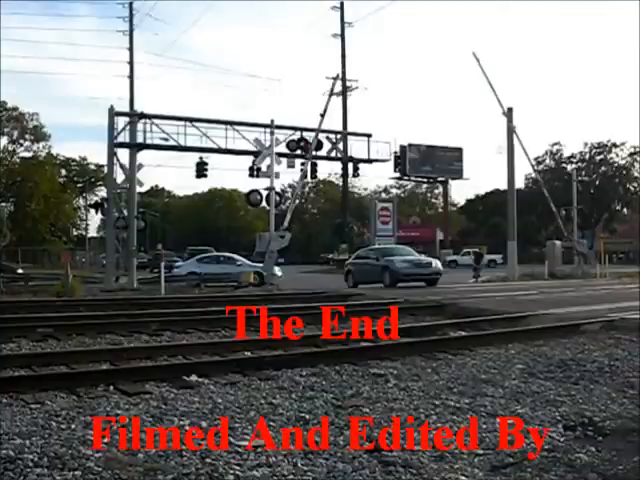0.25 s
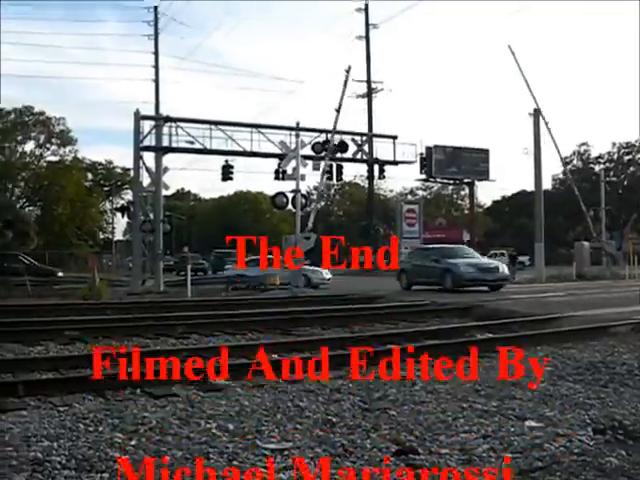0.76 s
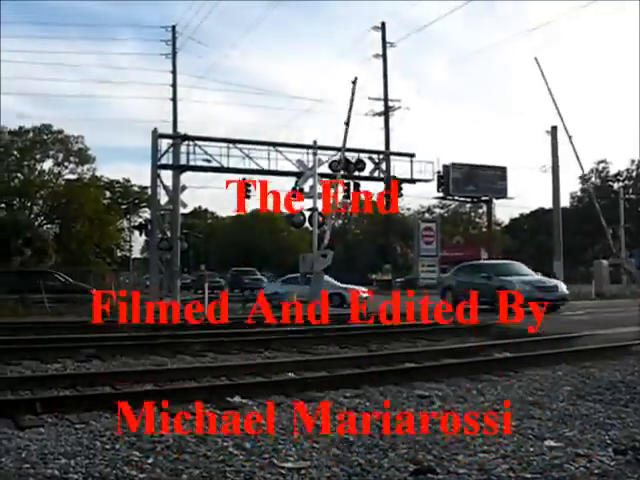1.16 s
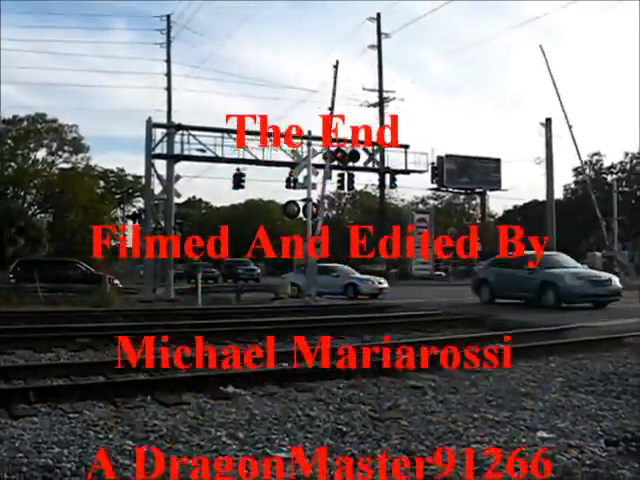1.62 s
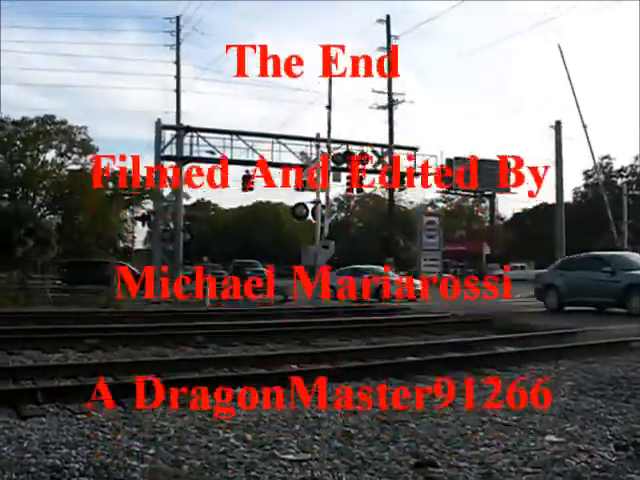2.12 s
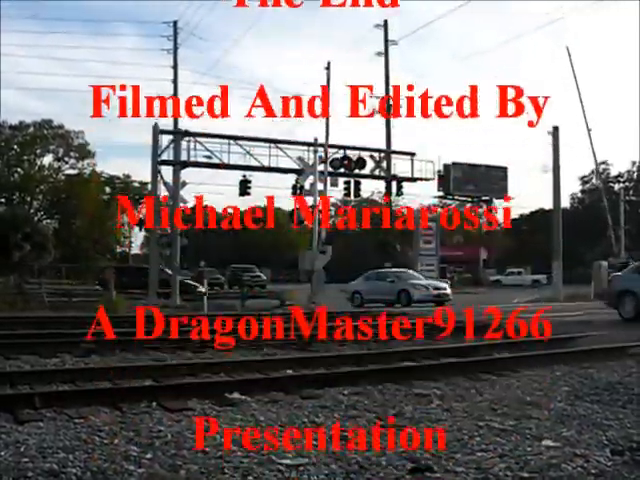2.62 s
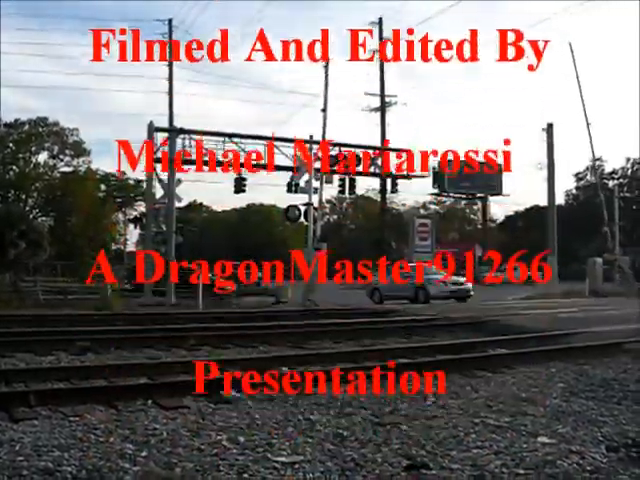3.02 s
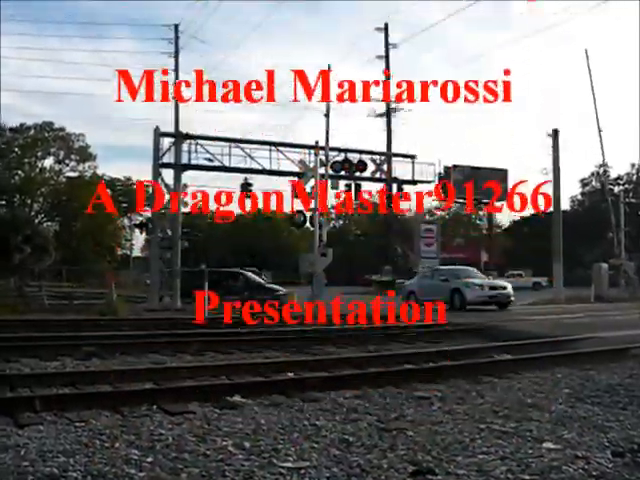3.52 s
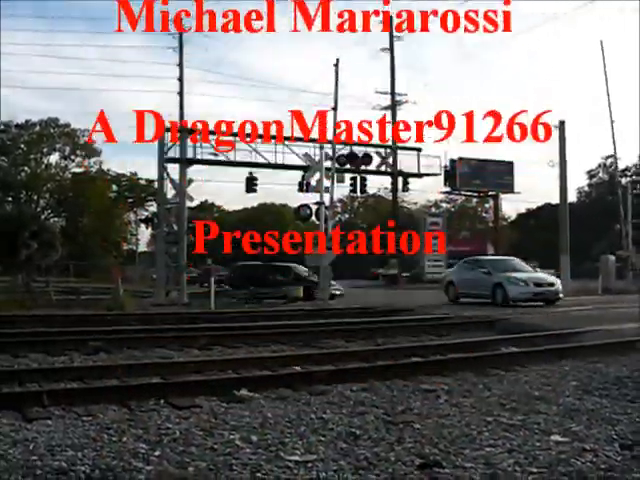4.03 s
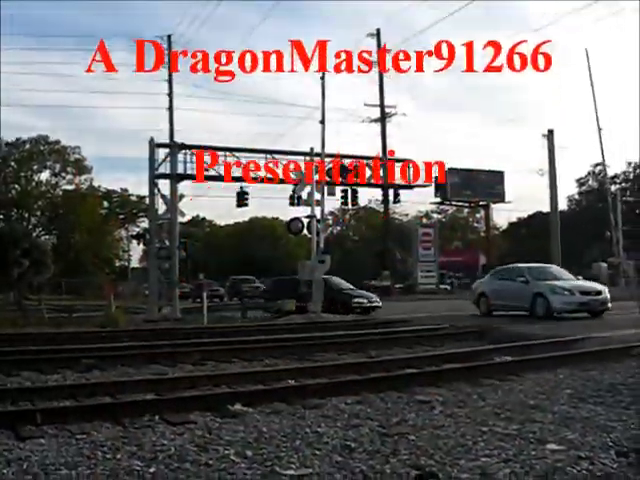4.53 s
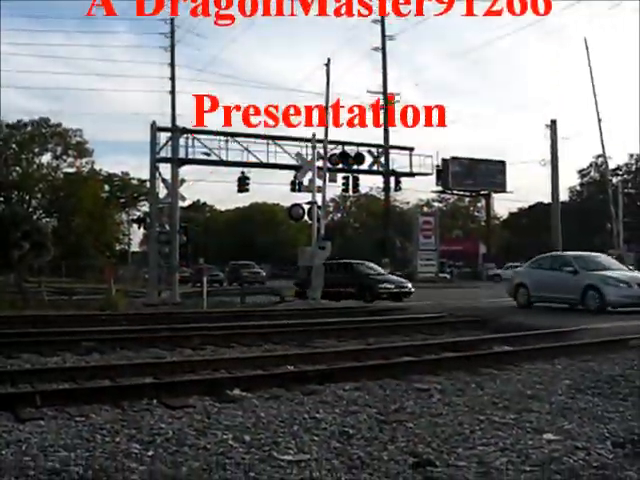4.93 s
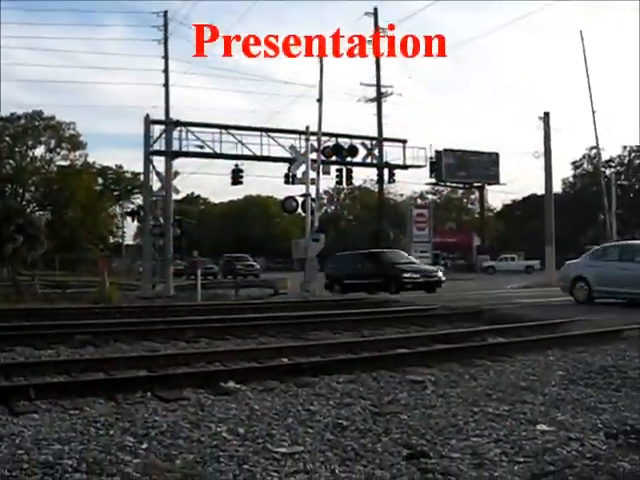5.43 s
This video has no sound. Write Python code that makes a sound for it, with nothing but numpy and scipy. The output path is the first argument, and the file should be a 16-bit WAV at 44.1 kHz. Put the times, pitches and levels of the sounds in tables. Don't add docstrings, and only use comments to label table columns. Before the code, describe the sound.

A small camera held outdoors in gusty wind, in mono, with its microphone overloaded at times. Lumpy low buffeting and brighter flutter run throughout, strongest around 1.9-2.1 s, with single pops of air. Well beneath, distant cars hiss over a road; an engine hums low, rising in pitch until about 3.3 s, with a very faint high belt whine. A knock and rub on the casing come at once, a faint brake squeal at 0.15-0.4 s, and a thin, high bird whistle at 0.7-1.1 s. Hard, hollow blows with plastic rattles hit near 0.9, 2.1 and 3.4 s, the level ducking briefly after the loudest. From 3.4 s it is somewhat calmer; the first engine slows while a second rises from 4.5 s. Soft low thumps at 4.6-4.9 s, dry button ticks at 4.7, 5.0 and 5.15 s, the nearest car's tyres around 5.35 s, and a scratchy rub at 5.6 s close it.

```python
import sys
import numpy as np
from scipy import signal
from scipy.fft import rfft, irfft, next_fast_len
from scipy.io import wavfile
from scipy.ndimage import uniform_filter1d, map_coordinates

SR = 44100
rng = np.random.default_rng(int(sys.argv[2]) if len(sys.argv) > 2 else 0)


def store_wav(level_fs):
    pcm = np.round(np.clip(np.atleast_2d(level_fs), -1, 1) * 32767)
    wavfile.write(sys.argv[1], SR, pcm.T.astype(np.int16))


def linear_from_db(decibels):
    return 10 ** (np.asarray(decibels, float) / 20)


N = 249606


def unit(x):
    return x / np.sqrt(np.mean(x ** 2) + 1e-20)


def along(points, hz):
    f, v = np.transpose(points)
    return np.interp(np.log(hz + 1), np.log(f + 1), v)


def curves(rows):
    s, *cols = np.transpose(rows)
    return [np.interp(np.arange(N) / SR, s, c) for c in cols]


def wobble(rate):
    knots = rng.standard_normal(int(N * rate / SR) + 4)
    return map_coordinates(knots, [np.arange(N) * rate / SR])


def swell(s, before, after):
    t = np.arange(N) / SR - s
    return np.where(t < 0, t / before, t / after)


def filtered(x, response):
    m = next_fast_len(len(x) + 8192)
    return irfft(rfft(x, m) * response(np.fft.rfftfreq(m, 1 / SR)), m)[:len(x)]


def body(modes):
    def response(f):
        total = 0
        for k, (hz, width, db) in enumerate(modes):
            total = total + (-1) ** k * linear_from_db(db) * 1j * f * width / (hz * hz - f * f + 1j * f * width)
        return total
    return response


def rush(colour_db, patchy_db):
    z = signal.stft(rng.standard_normal(N), nperseg=512)[2]
    field = uniform_filter1d(rng.standard_normal(z.shape), 5, 0)
    field = uniform_filter1d(field, 10, 1)
    x = signal.istft(z * linear_from_db(patchy_db * unit(field)), nperseg=512)[1][:N]
    return unit(filtered(x, lambda hz: linear_from_db(colour_db(hz))))


def burst(events, modes):
    x, t = np.zeros(N + SR), np.arange(SR // 4) / SR
    for s, db, t60 in events:
        rattle = linear_from_db(-60 * t / t60) * rng.standard_normal(len(t))
        blow = 2.5 * np.exp(-t / .00006)
        x[round(s * SR):][:len(t)] += linear_from_db(db) * (rattle - blow)
    return filtered(x, body(modes))[:N]


# peak in seconds, buffet in dB, half length in seconds, flutter under the buffet in dB.
GUSTS = [(0, -24, 0.047, -5.5), (.12, -21.5, 0.088, -3.5), (0.287, -28, 0.049, -6.5),
         (0.425, -17, 0.051, -4.5), (0.546, -21.5, 0.062, -0.5), (0.798, -17, 0.13, -6),
         (1.125, -21, 0.14, -9.5), (1.315, -23.5, 0.13, -7), (1.56, -22.5, 0.086, -10.5),
         (1.77, -17.5, 0.07, -13.5), (1.929, -12.5, 0.097, -5), (2.031, -16.5, 0.028, -4),
         (2.089, -15.5, 0.035, -5), (2.243, -17.5, 0.064, -18), (2.415, -22, 0.012, -8.5),
         (2.527, -18, 0.027, -7.5), (2.92, -18.5, 0.087, -12), (3.109, -19, 0.037, -6),
         (3.225, -17.5, 0.067, -9), (3.439, -20.5, 0.065, -6), (3.702, -30.5, 0.2, -1),
         (4.006, -24.5, 0.076, -5.5), (4.19, -23, 0.023, -14), (4.607, -18, 0.065, -7.5),
         (4.75, -21.5, 0.072, -9.5), (4.878, -19.5, .05, -6.5), (5.018, -18.5, 0.057, -7),
         (5.248, -22.5, 0.1, -3.5), (5.437, -21.5, 0.037, -7.5), (5.573, -27, 0.089, -4)]
# frequency in Hz, level in dB per Hz.
BUFFET = [(15, -68.5), (25, -37.5), (70, -6), (123, -2), (189, -2), (214, -4), (295, -6.5), (454, -17),
          (530, -17.5), (617, -18.5), (700, -24.5), (910, -48.5), (1540, -120)]
# frequency in Hz, level in dB per Hz.
FLUTTER = [(120, -36.5), (250, -4.5), (400, -1.5), (700, -7), (1000, -16.5), (1500, -23.5), (2200, -35.5),
           (3500, -46.5), (6000, -75.5), (10000, -125)]


def wind():
    calm_db, flutter_calm_db = -22.5, -36.5
    low_power, high_power = linear_from_db(2 * calm_db), linear_from_db(2 * flutter_calm_db)
    for s, db, half, flutter_db in GUSTS:
        shape = np.exp(-swell(s, half, 1.305 * half) ** 2)
        low_power = low_power + linear_from_db(2 * db) * shape
        high_power = high_power + linear_from_db(2 * (db + flutter_db)) * shape
    eddies = 0.72 * wobble(15) + 1.09 * wobble(45)
    low_lumps = linear_from_db(eddies + 0.43 * wobble(22))
    high_lumps = linear_from_db(0.53 * eddies + 1.2 * wobble(70) + 1.2 * wobble(20))
    buffet = unit(low_lumps * rush(lambda hz: along(BUFFET, hz), patchy_db=0.52))
    flutter = unit(high_lumps * rush(lambda hz: along(FLUTTER, hz), patchy_db=0.67))
    return linear_from_db(-1.0) * np.sqrt(low_power) * buffet + np.sqrt(high_power) * flutter


# nearest in seconds, tyre level in dB, seconds of coming, seconds of going.
PASSES = [
    (0.101, -54.5, .5, 0.89),
    (2.0, -52.5, 0.32, 0.12),
    (3.25, -52.5, 0.32, 0.12),
    (4.4, -53, 0.15, .3),
    (5.352, -47, 0.29, 0.9),
]
# time in seconds, level in dB.
FAR = [(0, -61), (1.6, -61), (2.0, -57), (2.3, -63.5), (3.25, -58), (3.5, -64), (3.85, -64.5), (4.4, -62),
       (5.0, -61), (5.66, -60.5)]
# frequency in Hz, level in dB per Hz.
TYRES = [(500, -23.5), (900, 4.5), (1300, 3.5), (1800, -6.5), (2400, -10.5), (3000, -12.5), (3700, -18.5),
         (4100, -25.5), (6000, -43), (10000, -110)]
# frequency in Hz, level in dB per Hz.
AIR = [(2000, -19), (3500, -2.5), (4500, -4.5), (5500, -6), (6500, -5.5), (7500, -9), (8700, -10.5),
       (10000, -15), (11500, -19), (13500, -44.5)]
# centre in Hz, width in Hz, lift in dB.
PORT = [(2500, 90, 2.5), (3700, 200, 3), (5040, 120, 3), (6500, 500, 3)]


def road():
    def lift(hz):
        return sum(db / (1 + ((hz - centre) / width) ** 2) for centre, width, db in PORT)

    power = sum(linear_from_db(2 * db) / (1 + swell(s, coming, going) ** 2) for s, db, coming, going in PASSES)
    near_db = 10 * np.log10(power) + 12 + 0.49 * wobble(5)
    far_db, = curves(FAR)
    near = linear_from_db(near_db) * rush(lambda hz: along(TYRES, hz) + lift(hz), patchy_db=1.5)
    far = linear_from_db(far_db + 2.0) * rush(lambda hz: along(AIR, hz) + lift(hz), patchy_db=2.0)
    return near + far


# time in seconds, shaft speed in Hz, effort in dB.
FIRST = [(0, 29.3, -31), (.8, 31.5, -30.5), (1.4, 35, -27), (2, 39.03, -22.5), (2.5, 41.02, -27),
         (2.9, 42.53, -23.5), (3.3, 43.62, -24.5), (3.6, 43.57, -28), (3.9, 42.8, -19.5),
         (4.05, 42.36, -27.5), (4.3, 42.06, -24.5), (4.6, 41.3, -23.5), (4.8, 39.35, -22.5),
         (5.0, 38.44, -28.5), (5.66, 35.1, -36)]
# time in seconds, shaft speed in Hz, effort in dB.
SECOND = [
    (4.45, 39.65, -61),
    (4.65, 42.04, -29.5),
    (4.85, 45.17, -23.5),
    (4.97, 47.9, -25),
    (5.2, 48.53, -31),
    (5.45, 49.48, -26),
    (5.66, 50.6, -21),
]
# multiple, level in dB, swing in dB, period in seconds, time of a crest in seconds.
ORDER = [(2, -3, 3, 0.87, 3.245), (3, 0.5, 0.5, 0.51, 3.94), (4, -4.5, 4.5, 1.6, 2.9)]


def engine(rows):
    pipe_hz, pipe_width_hz = 42.8, 3.6
    shaft_hz, effort_db = curves(rows)
    t = np.arange(N) / SR
    turn = 2 * np.pi * np.cumsum(shaft_hz * (1 + .003 * wobble(6))) / SR
    pipe = 1 / np.sqrt(1 + ((shaft_hz - pipe_hz) / pipe_width_hz) ** 2)
    out = np.zeros(N)
    for k, db, swing, period, crest in ORDER:
        echo_db = swing * np.cos(2 * np.pi * (t - crest) / period)
        tone = np.sqrt(2) * linear_from_db(effort_db + db + echo_db) * np.sin(round(k) * turn)
        out += tone if round(k) % 2 else tone * pipe
    return out


# time in seconds, pitch in Hz, level in dB.
WHINE = [(0, 2500, -66), (1.2, 2500, -64), (2.2, 2500, -61), (2.65, 2530, -57.5), (3.2, 2580, -56),
         (3.5, 2570, -62), (4.0, 2560, -60), (4.5, 2570, -61), (5.0, 2590, -63), (5.66, 2600, -63)]


def whine():
    hz, db = curves(WHINE)
    turn = 2 * np.pi * np.cumsum(hz) / SR

    def band(k):
        spread_hz = 160 * k
        return wobble(spread_hz) * np.sin(k * turn) + wobble(spread_hz) * np.cos(k * turn)

    return linear_from_db(db) * (unit(band(0.98)) + linear_from_db(-8) * unit(band(3 / 2)))


# start in seconds, shell level in dB, button level in dB, time to die by 60 dB in
# seconds, brightness in dB.
RATTLES = [(.041, -7, -28.5, .04, -2), (.297, -32, -33.5, .05, 1), (.796, -13, -21, .031, 4.5),
           (.866, -11.5, -37, 0.11, -0.5), (.8996, -11.5, -30, 0.026, 0), (.902, -15, -29, .03, -8),
           (.9086, -32, -38, .027, -2), (2.133, -13, -21, 0.03, -1), (2.1339, -20, -30, .04, 1),
           (2.1365, -19, -16.5, .02, -1), (2.1384, -22, -17.5, .03, 0), (2.355, -30, -41, 0.1, 0),
           (2.513, -22, -43, 0.035, -3), (3.092, -22, -45, .03, -3), (3.191, -20.5, -45, 0.033, -2),
           (3.207, -27, -31, .033, 0), (3.369, -51, -27, .04, 0.5), (3.3777, -15, -13.5, 0.026, -3),
           (3.387, -15.5, -23, 0.044, -2.5), (3.396, -14, -28, 0.05, -5), (3.429, -17, -28, 0.045, -2),
           (3.435, -11, -29.5, 0.03, -4), (3.5261, -33, -29, .035, 4), (2.578, -27, -50, .025, 0),
           (3.949, -22, -49, 0.028, 1), (3.618, -21, -48, 0.022, -2), (3.717, -30, -41, .028, -3),
           (3.995, -20.5, -49, 0.037, 1), (5.284, -19, -46, 0.029, 0), (5.441, -21, -47, 0.026, 0)]
# frequency in Hz, width in Hz, level in dB.
SHELL = [(340, 79, 5.5), (486, 80, -3.5), (638, 170, -8), (814, 100, 3.5), (1240, 210, -11.5)]
# frequency in Hz, width in Hz, level in dB.
CLICK = [(1440, 290, -0.5), (1850, 250, -0.5), (2215, 270, 1.5), (2570, 290, -5.5), (3400, 250, -13),
         (4390, 120, -12.5)]


def rattles():
    shell = burst([(s, db + 15, t60) for s, db, _, t60, _ in RATTLES], SHELL)
    click = np.zeros(N)
    for lean, modes in ((-1, CLICK[:2]), (0, CLICK[2:4]), (1, CLICK[4:])):
        click += burst([(s, db + 9 + lean * bright, t60) for s, _, db, t60, bright in RATTLES], modes)
    click = filtered(click, lambda hz: 1 / (1 + 1j * hz / 3600 - (hz / 5000) ** 2) ** 1.9)
    return filtered(shell, lambda hz: 1 / (1 + 1j * hz / 1500) ** 2) + click


# middle in seconds, half length in
# seconds, level in dB, pitch in Hz, width in Hz.
RUBS = [(.17, .015, -38, 1500, 280), (2.094, .004, -33, 1400, 450), (2.378, .025, -40, 1560, 380),
        (2.364, .006, -48.5, 2900, 1200), (2.8, 0.01, -40, 1340, 500), (.112, .008, -51, 3400, 500),
        (.251, .004, -51, 3700, 250), (5.2, .04, -46, 2670, 250), (5.22, .035, -48, 3150, 500),
        (5.18, 0.022, -56, 5900, 700), (5.245, 0.033, -57, 5950, 500), (5.22, .025, -60, 6370, 200),
        (5.235, .03, -60, 7300, 500), (5.335, .02, -59, 6000, 400), (5.375, .015, -63, 5950, 300),
        (5.34, .015, -52, 2600, 250), (5.42, .015, -53, 3400, 300), (5.503, .008, -44, 2400, 300),
        (5.63, 0.013, -50, 3340, 500), (5.615, 0.011, -46, 2000, 400), (5.545, 0.014, -41, 2600, 350),
        (5.562, 0.011, -36, 1950, 300), (5.585, .012, -33, 1850, 280), (5.602, .01, -37.5, 1900, 280),
        (5.575, .014, -39, 2830, 300), (5.597, .012, -40, 2600, 330), (5.575, .03, -54, 3900, 700),
        (5.57, .02, -57, 4560, 300), (5.58, .04, -63, 5700, 700), (1.865, 0.04, -15, 150.5, 40),
        (3.397, .012, -33.5, 1800, 720), (3.4335, .003, -44, 3700, 500), (3.434, .008, -32, 1340, 690),
        (5.225, .05, -53, 4000, 4000), (5.34, .025, -58, 5500, 4000), (5.57, 0.045, -39, 2600, 1400),
        (5.58, .045, -57, 5000, 2300), (4.62, .1, -45, 1800, 350),
        (.9035, .003, -38, 3500, 450), (.904, 0.006, -31.5, 1950, 290), (.799, 0.0035, -38, 2460, 300),
          (3.53, .005, -34, 2130, 340), (.903, .005, -24, 1040, 850), (4.35, 0.17, -39.5, 757, 110),
          (2.1343, .0012, -24, 2350, 800), (2.1385, .002, -21, 2200, 800), (2.137, .004, -38, 5500, 2500),
          (3.394, .009, -19, 850, 200), (3.38, .0025, -22, 2150, 600), (.7975, .002, -41, 4350, 500),
          (.9035, .003, -38, 3500, 450), (.044, .003, -18, 900, 250), (4.62, .1, -45, 1800, 350)]


def rubs():
    out, rough, span = np.zeros(N), linear_from_db(3 * wobble(160)), SR // 2
    for s, half, db, hz, width in RUBS:
        start = int(np.clip(s * SR - span / 2, 0, N - span))
        grit = rough[start:start + span] * rng.standard_normal(span)
        t = (start + np.arange(span)) / SR
        ring = body([(hz, abs(width) + 1, 0)])
        stroke = unit(filtered(grit, lambda f: ring(f) ** 2))
        out[start:start + span] += linear_from_db(db) * np.exp(-((t - s) / half) ** 2) * stroke
    return filtered(out, lambda hz: 1 / np.sqrt(1 + (hz / 7600) ** 12))


# start in seconds, level in dB, time to die by 60 dB in
# seconds, pitch in Hz.
THUMPS = [(0.0454, -1.5, 0.057, 235), (0.8996, 3, .03, 285), (0.9089, 8.5, 0.02, 255),
          (.9136, -7.5, 0.3, 221), (3.3796, 7.5, .038, 255), (2.1342, 6, .1, 229),
          (2.1325, -0.5, 0.019, 480), (2.356, -16.5, 0.068, 229), (3.207, 1, 0.047, 221),
          (3.342, -4.5, 0.03, 229), (3.373, -4.5, .04, 150), (3.397, -5.5, 0.22, 220.7),
          (3.435, -4, .05, 221), (3.5276, 2, 0.023, 233), (3.717, -14, 0.028, 226), (4.609, -1.5, .06, 130),
          (4.738, -6.5, 0.096, 141), (4.885, -7.5, 0.09, 140), (5.441, -6, 0.058, 228)]


def thumps():
    out, t = np.zeros(N + SR), np.arange(SR // 4) / SR
    for s, db, t60, hz in THUMPS:
        onset = 1 - np.exp(-t / 0.00087)
        out[round(s * SR):][:len(t)] -= linear_from_db(db - 60 * t / t60) * onset * np.sin(2 * np.pi * hz * t)
    return out[:N]


# peak in seconds, level in dB, push 1 or pull -1, pitch in Hz.
PUFFS = [(0.1039, -13, 1, 200.0), (0.1573, -9, -1, 180.0), (0.2865, -9.5, 1, 150.0),
         (0.4353, -8.5, -1, 120.0), (0.4486, -5, -1, 240.0), (0.5106, -9, 1, 140.0),
         (0.5623, -13, -1, 160.0), (0.5806, -10.5, -1, 320.0), (0.702, -10, 1, 190.0),
         (0.7864, -8, -1, 130.0), (0.8026, -8, -1, 190.0), (1.0098, -5, 1, 140.0), (1.0691, -13, 1, 150.0),
         (1.1387, -5.5, 1, 200.0), (1.2498, -10, 1, 160.0), (1.7735, -8, -1, 120.0),
         (1.8133, -11, -1, 130.0), (1.8695, -4, -1, 150.0), (1.8936, -4.9, 1, 211), (1.908, -6, 1, 170.0),
         (1.9328, -4, -1, 160.0), (1.9446, -3, 1, 210.0), (1.965, 2, -1, 180.0), (1.996, -5.5, 1, 200.0),
         (2.0244, -5, 1, 230.0), (2.0546, -7, -1, 180.0), (2.0874, -7, 1, 180.0), (2.2177, -7, -1, 131),
         (2.26, -3.5, -1, 140.0), (2.4149, -8, -1, 240.0), (2.5152, -7.7, 1, 260.0),
         (2.5512, -9, -1, 150.0), (2.86, -10.0, -1, 200.0), (2.9295, -9.6, -1, 120.0), (3.07, -10, -1, 161),
         (3.1206, -11, 1, 140.0), (3.1402, -5, 1, 220.0), (3.1937, -9, -1, 130.0), (3.253, -7.9, -1, 150.0),
         (4.0005, -12, -1, 170.0), (4.1806, -8.8, 1, 160.0), (4.2125, -7, 1, 161), (4.8178, -7.5, 1, 140.0),
         (4.9394, -8, 1, 150.0), (5.0022, -9.4, -1, 170.0), (5.1604, -10, -1, 170.0),
         (5.2452, -9, 1, 120.0), (5.422, -7, 1, 140.0)]


def puffs():
    fade, rounding = 2.5, .06
    out, t = np.zeros(N + SR), (np.arange(SR // 10) - SR // 20) / SR
    for s, db, push, hz in PUFFS:
        envelope = np.exp(-fade * (np.hypot(hz * t, rounding) - rounding))
        shape = np.cos(2 * np.pi * hz * t) * envelope
        out[round(s * SR):][:len(t)] += np.sign(push) * linear_from_db(db - 1) * shape
    return filtered(out[SR // 20:][:N], lambda hz: hz ** 2 / (hz ** 2 + 55 ** 2))


# start in seconds, end in seconds, start pitch in Hz, end pitch in Hz, level in dB.
SQUEAL = [
    (.14, .27, 1290, 1280, -46),
    (.33, .42, 1280, 1265, -43),
]
BIRD = [
    (.67, .815, 6450, 6630, -65),
    (.815, .905, 6700, 6850, -64),
    (.85, .99, 6330, 6430, -63),
    (.86, .97, 6600, 6620, -67),
    (.98, 1.07, 6660, 6770, -67),
    (1.05, 1.095, 6760, 6800, -61),
]


def whistle(rows):
    t, out = np.arange(N) / SR, 0
    for start, end, start_hz, end_hz, db in rows:
        u = np.clip((t - start) / (end - start), 0, 1)
        hz = start_hz + (end_hz - start_hz) * u + 18 * wobble(45)
        level = linear_from_db(db + 2 + 3 * wobble(45)) * np.sqrt(np.abs(np.sin(np.pi * u)))
        out = out + level * np.sin(2 * np.pi * np.cumsum(hz) / SR)
    return out


# start in seconds, level in dB, time to die by 60 dB in seconds, dull part in dB.
TICKS = [
    (4.699, -26.5, .022, 2.5),
    (5.036, -25, 0.0088, -3),
    (5.155, -24, .016, -15),
]
# frequency in Hz, width in Hz, level in dB.
TICK = [(700, 430, 9), (1480, 1000, 1), (2680, 340, -2), (4050, 1400, -15.5), (6060, 930, -17)]


def ticks():
    dull = burst([(s, db + low, t60) for s, db, t60, low in TICKS], TICK[:2])
    bright = burst([row[:3] for row in TICKS], TICK[2:])
    return linear_from_db(12.0) * filtered(dull + bright, lambda hz: 1 / (1 + 1j * hz / 7000) ** 3)


def scene():
    air_and_cars = wind() + road() + engine(FIRST) + engine(SECOND) + whine()
    handling = rattles() + rubs() + thumps() + puffs() + ticks()
    return (air_and_cars + handling + whistle(SQUEAL) + whistle(BIRD))[None]


def starved(x):
    lead, height = 2048 - 97, 16
    frame = dict(window="cosine", nperseg=2048, noverlap=1024)
    hz, _, z = signal.stft(np.pad(x, (lead, 4096), "reflect"), SR, **frame)
    band = np.arange(len(hz)) // height
    power = np.abs(z) ** 2
    band_power = np.add.reduceat(power, np.arange(0, len(hz), height), axis=0) / height
    level_db = 10 * np.log10(band_power + 1e-16)
    level_db = (level_db + 4 * rng.standard_normal(level_db.shape))[band]
    loud = np.sqrt(np.sum(power, axis=0))
    held = np.maximum(loud, np.roll(loud, 1))
    bass_safe_db = 45 / (1 + (hz[::height][band, None] / 7000) ** 20)
    bar_db = -95 + 75 * np.clip(held - .11, 0, .2) - bass_safe_db
    return signal.istft(z * (level_db > bar_db), SR, **frame)[1][lead:][:N]


def band_limit(x):
    return signal.sosfilt(signal.butter(12, 15600, fs=SR, output="sos"), x)


def record(dry):
    x = filtered(dry[0], lambda hz: (1j * hz / (35 + 1j * hz)) ** 2)
    over = np.clip(uniform_filter1d(np.abs(x), 400) - .35, 0, None)
    back = np.exp(-1 / (.09 * SR))
    late = np.pad(over, (500, 0))[:N]
    duck_db = 40 * signal.lfilter([1 - back], [1, -back], late)
    clipped = np.clip(x * linear_from_db(-duck_db), -1.02, 1.02)
    mix = np.clip(starved(clipped), -.99, .99)
    return band_limit(mix[None])


dry = scene()
out = record(dry)
store_wav(out)
```